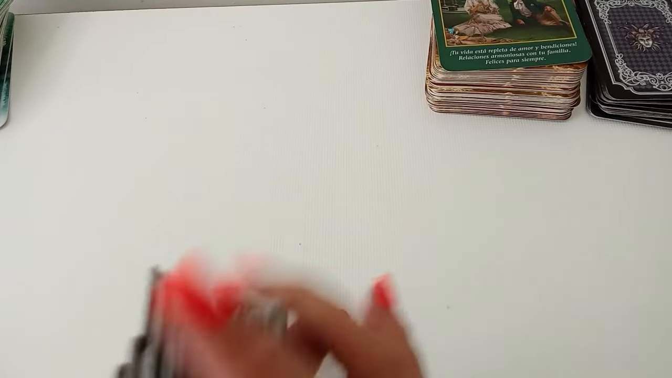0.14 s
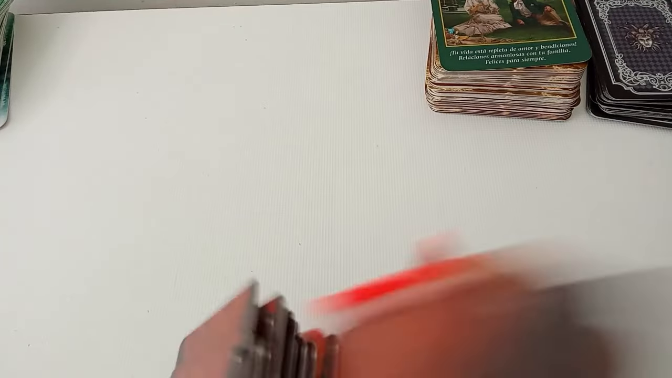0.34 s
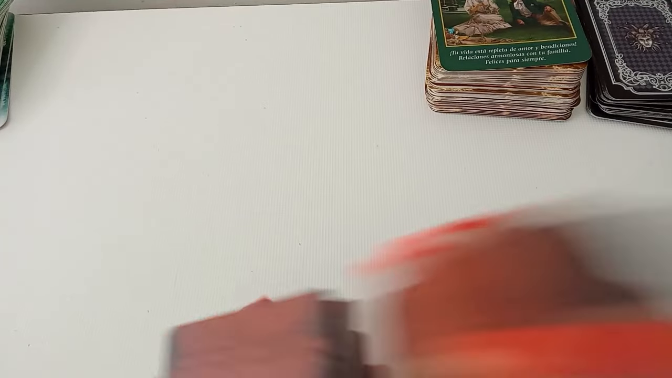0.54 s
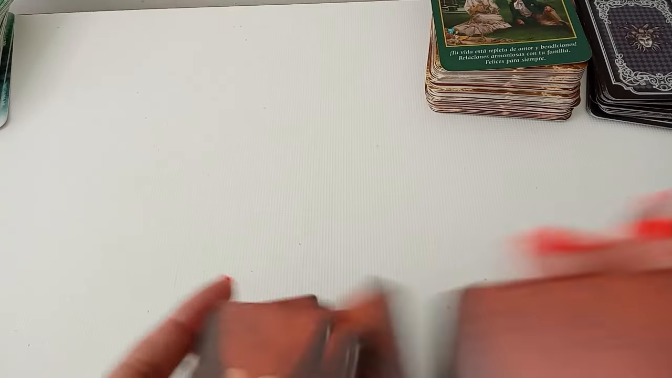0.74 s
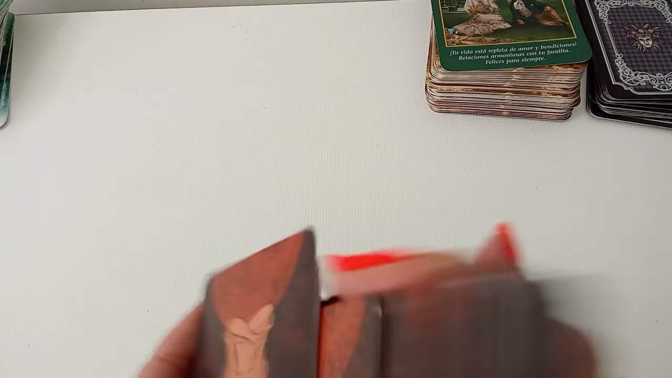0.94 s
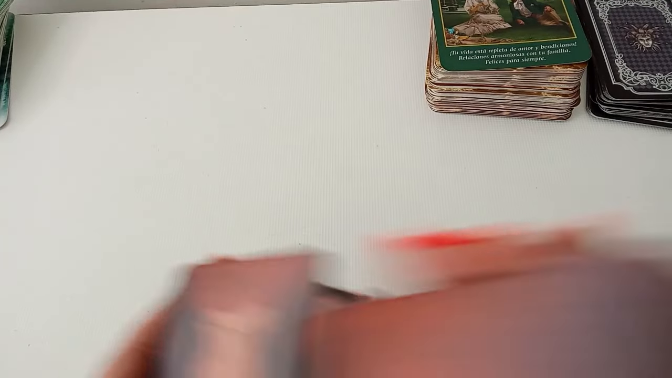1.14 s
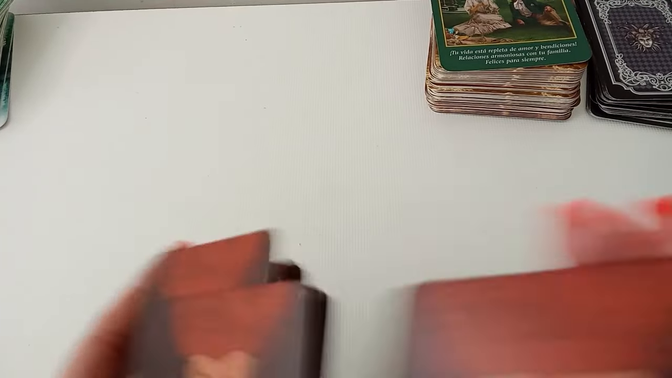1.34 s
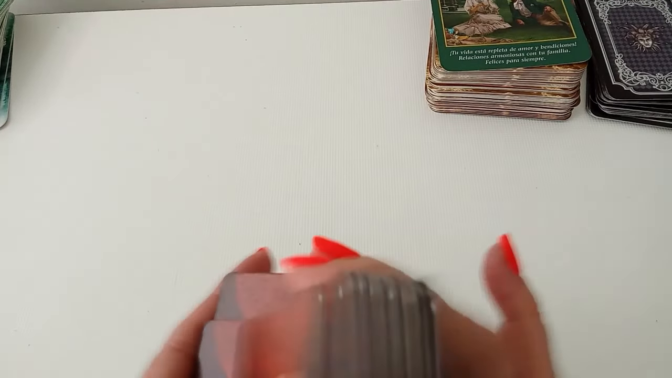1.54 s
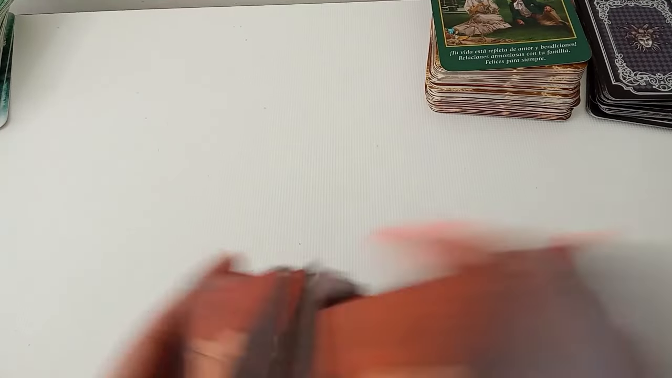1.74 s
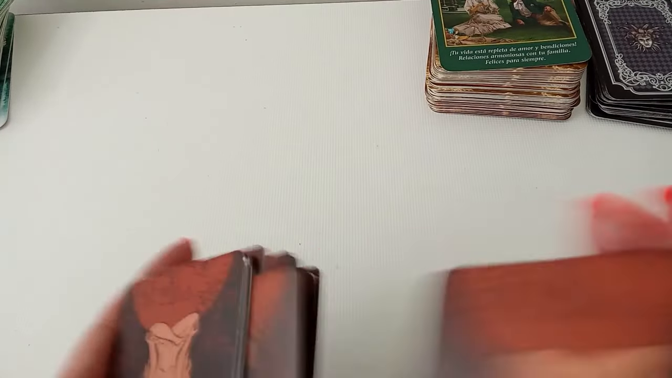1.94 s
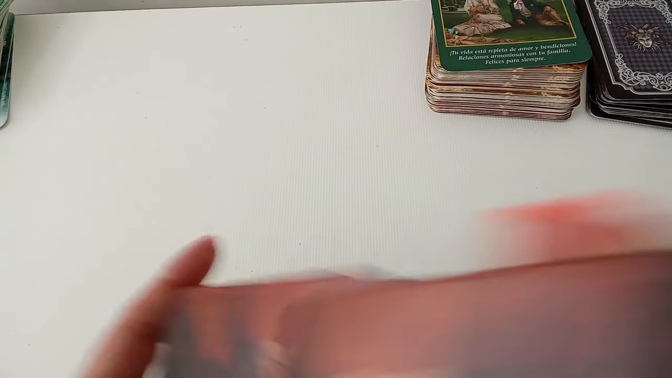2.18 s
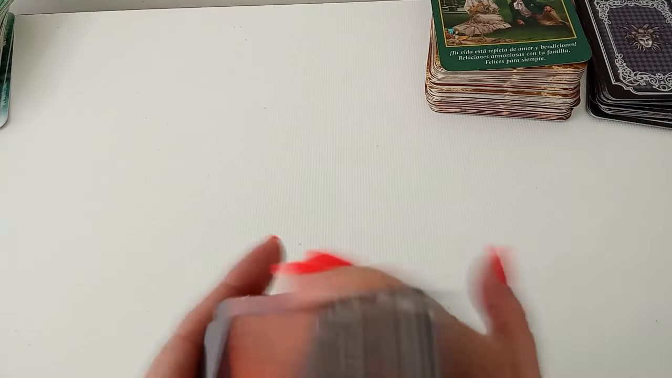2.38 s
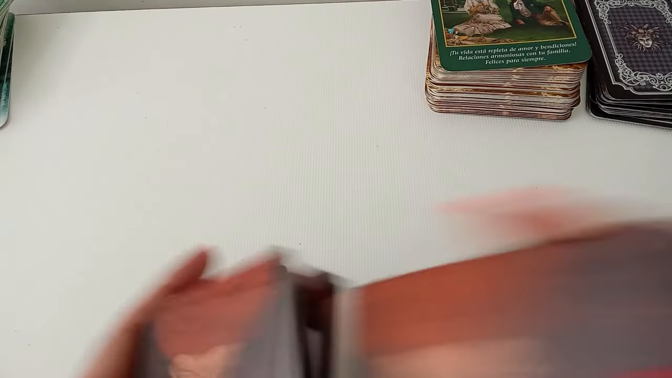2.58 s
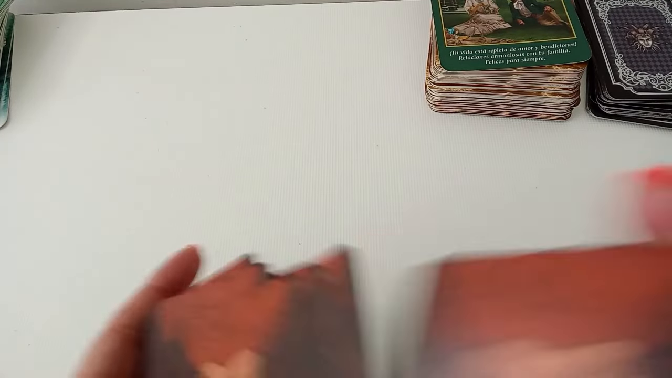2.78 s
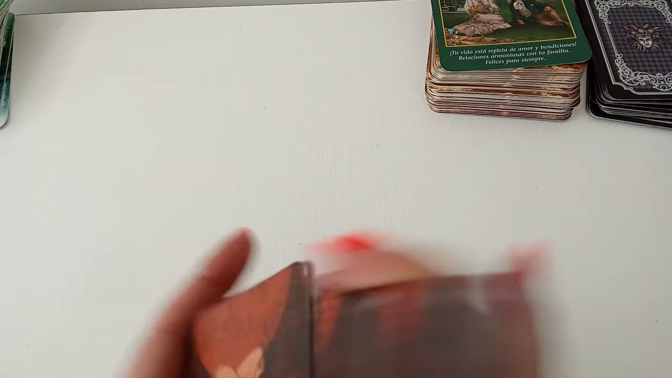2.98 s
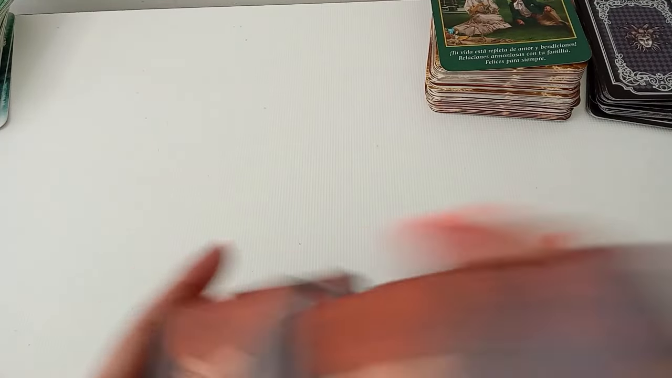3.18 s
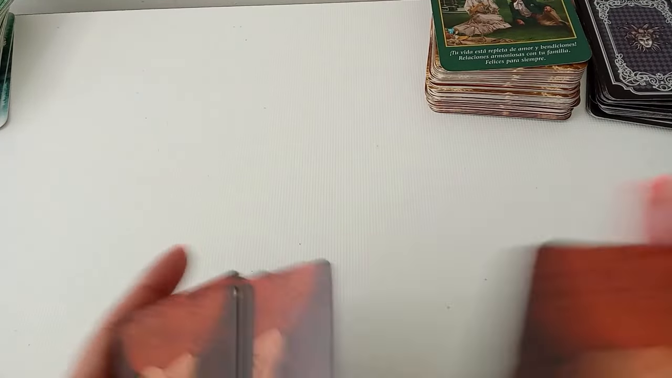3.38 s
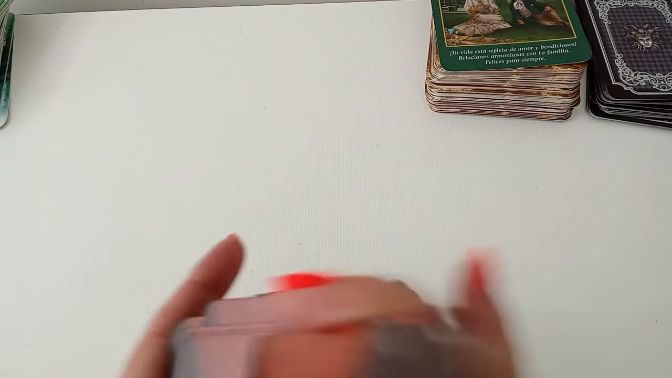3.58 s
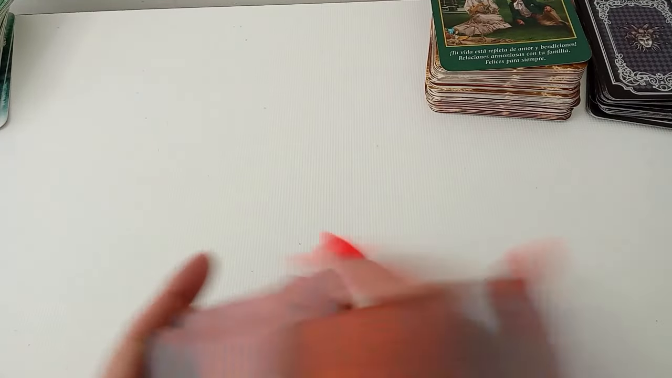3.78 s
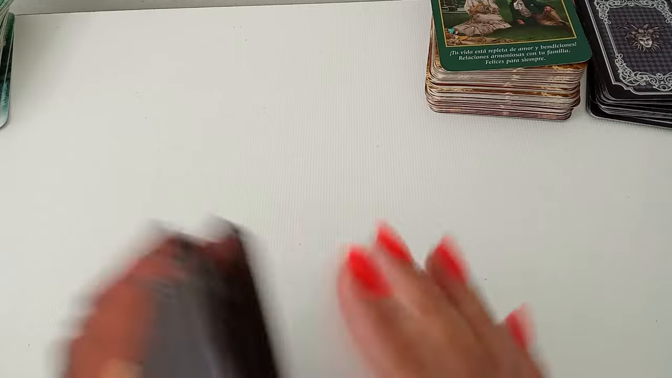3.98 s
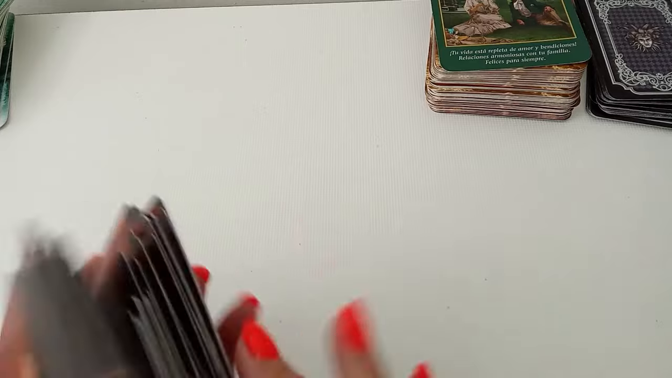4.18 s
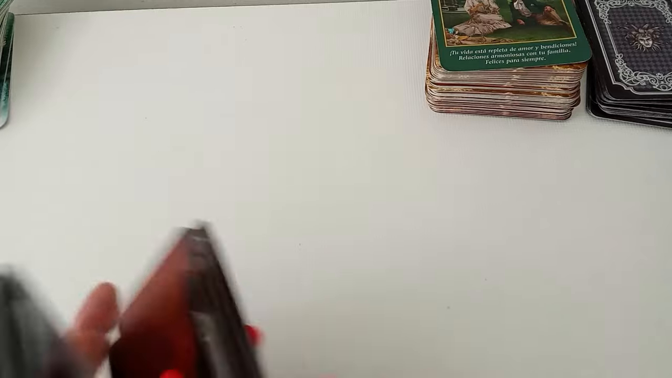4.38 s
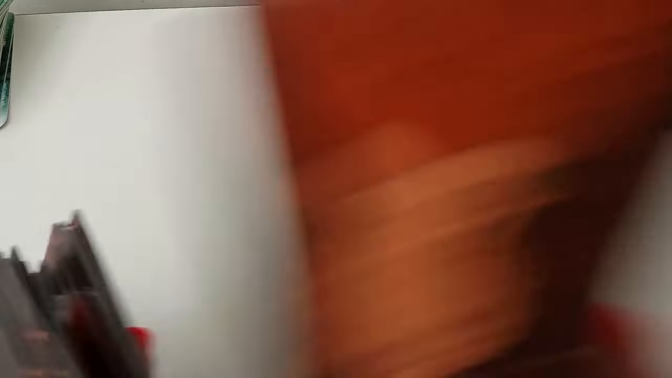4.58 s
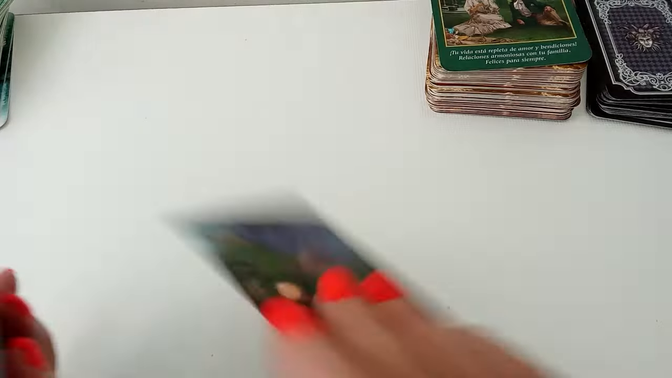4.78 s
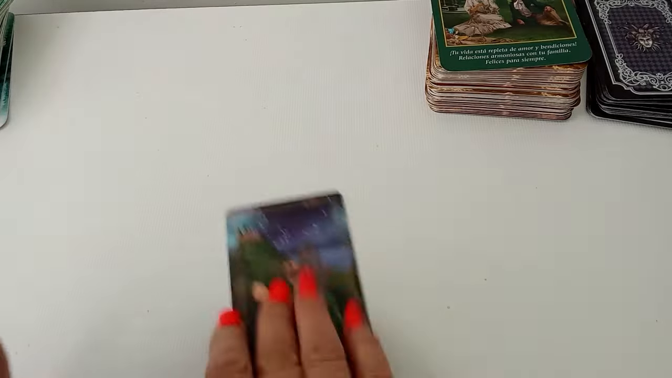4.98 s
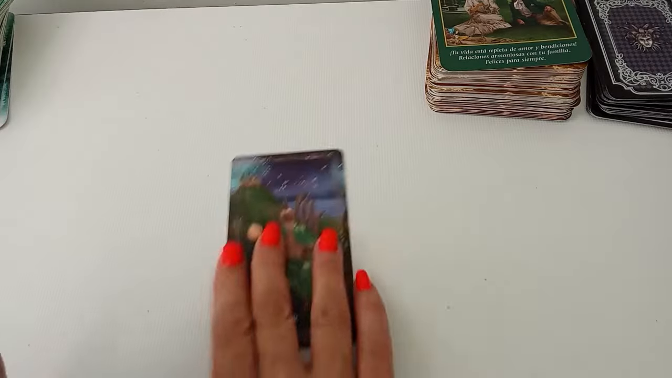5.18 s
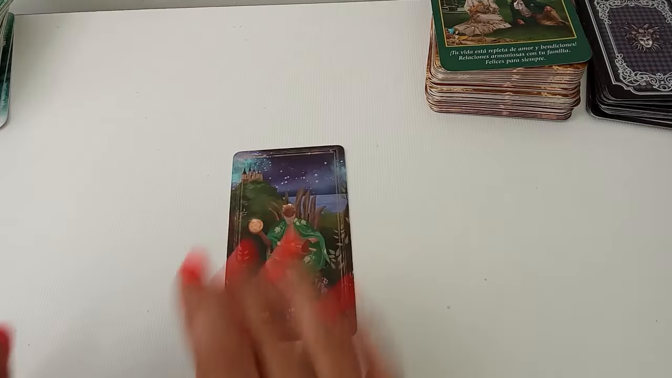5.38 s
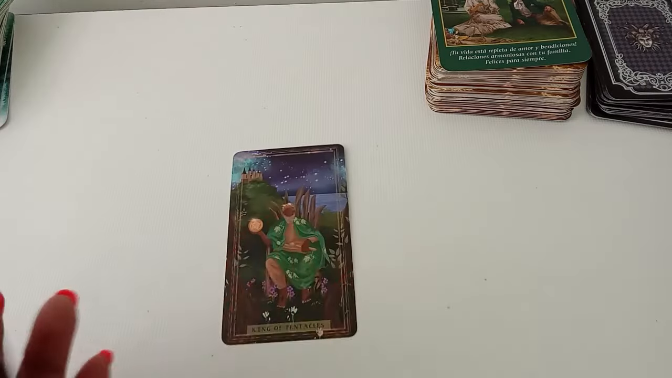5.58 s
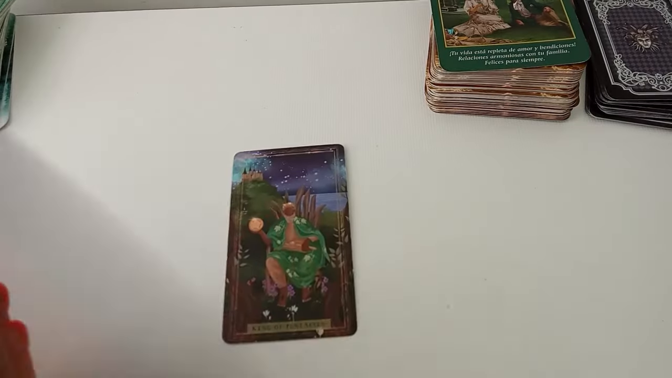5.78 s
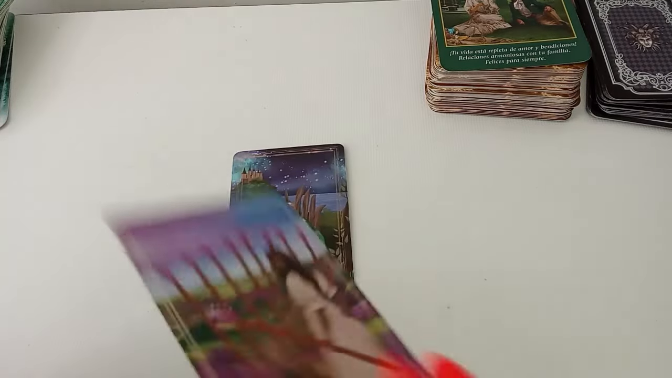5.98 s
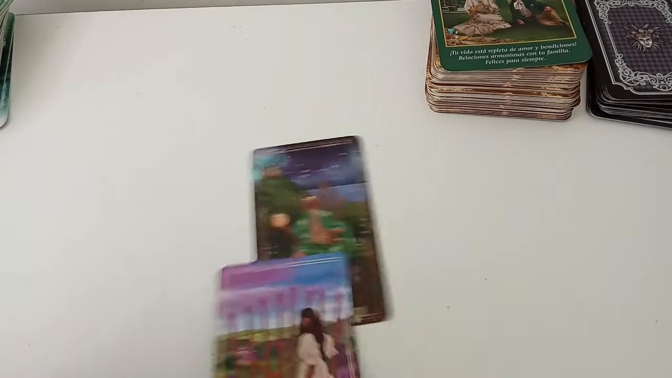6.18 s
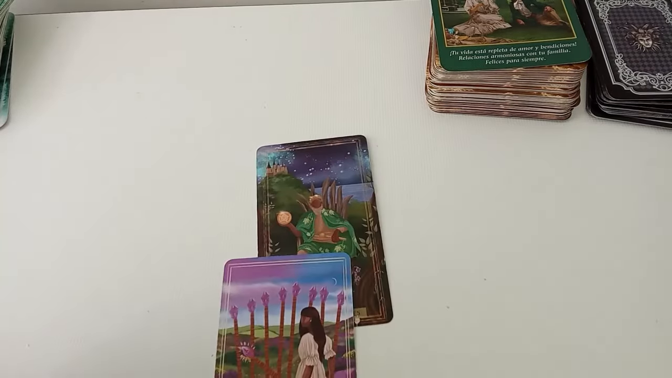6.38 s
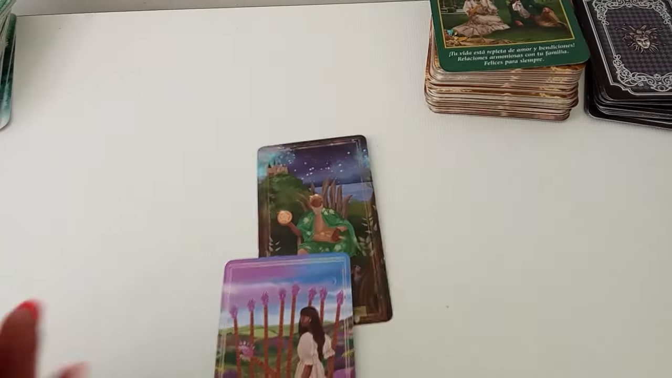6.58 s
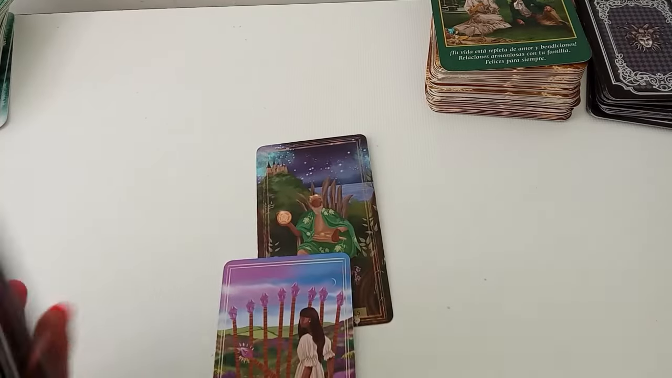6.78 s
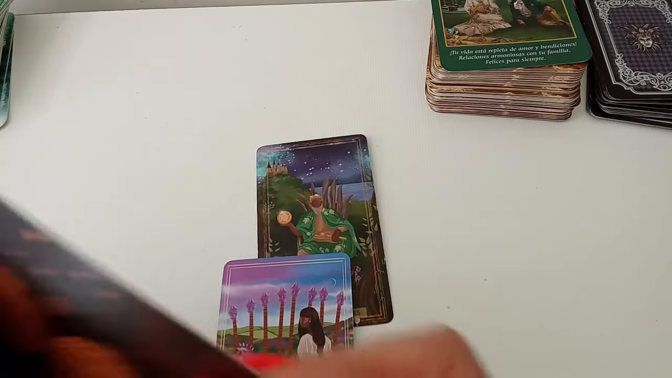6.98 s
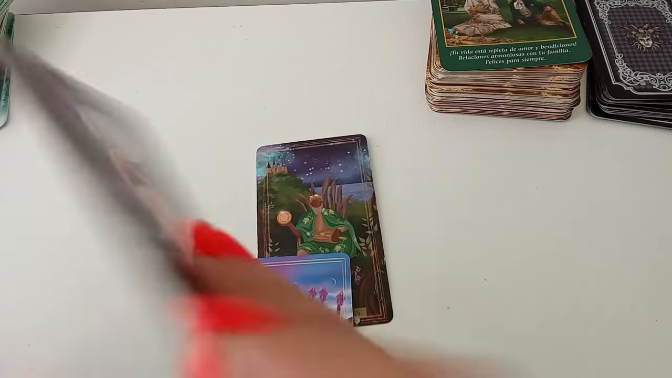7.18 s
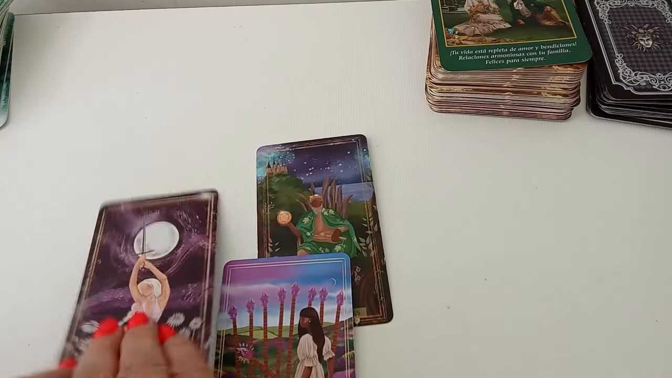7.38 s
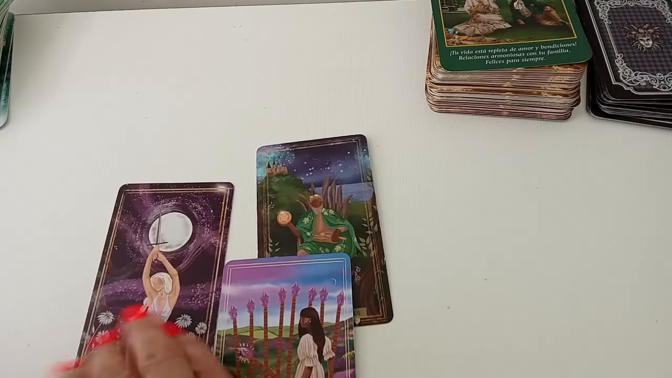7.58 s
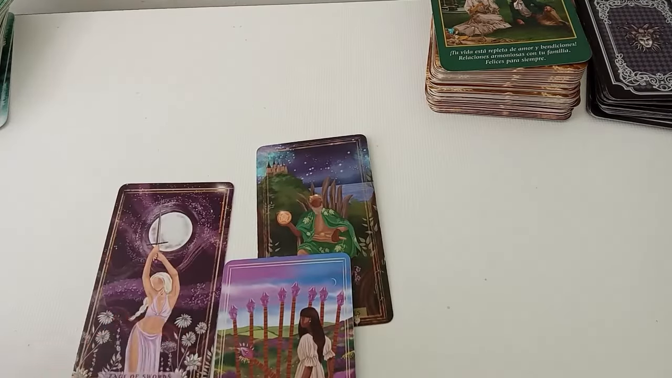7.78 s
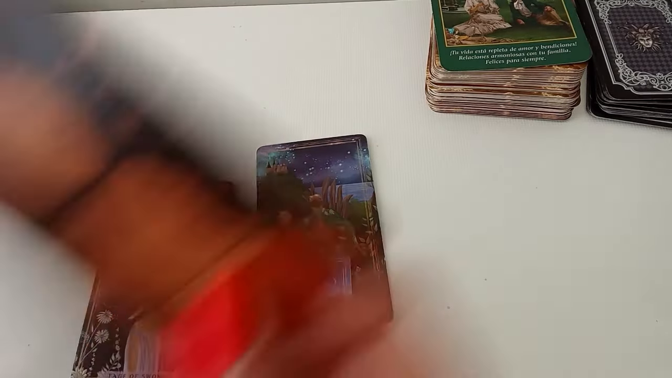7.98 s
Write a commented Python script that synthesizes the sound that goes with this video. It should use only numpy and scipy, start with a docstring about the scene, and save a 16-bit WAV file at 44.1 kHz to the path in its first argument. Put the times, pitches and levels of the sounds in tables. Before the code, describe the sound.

A deck of stiff cards is shuffled by hand, then three cards are dealt onto a hard table in a quiet room.

```python
"""Quiet room, hard table: hands shuffle a deck of stiff cards overhand, then deal three cards.
Faces slide with a grainy friction hiss, the deck thuds on palm or table, edges swish past.
Packets knock together, cards slap down, the table top rings; twice a corner flicks free.
The room rings for about half a second over a faint room tone.
Two microphone signals are summed under 1 ms apart: comb notches, a hollow colour."""
import sys
import numpy as np
from scipy import signal
from scipy.fft import rfft, irfft, next_fast_len
from scipy.io import wavfile
from scipy.ndimage import uniform_filter1d

SR = 44100
rng = np.random.default_rng(int(sys.argv[2]) if len(sys.argv) > 2 else 0)


def pcm_store(signal):
    """Save signal as 16-bit PCM."""
    levels = np.round(np.clip(np.atleast_2d(signal), -1, 1) * 32767)
    wavfile.write(sys.argv[1], SR, levels.astype(np.int16).T)


N = 354563

# faces sliding: t/s, length/s, hiss level/dB, brightness/dB, first-contact boost/dB
STROKES = [(0.0, 0.073, -71, 4.5, 12), (0.079, 0.21, -75, -8, -8), (0.31, 0.11, -76, -6, -3.5),
           (0.431, 0.061, -59, -3.5, -7.5), (0.689, 0.16, -64.5, -7.5, 4), (0.821, 0.16, -70, -6, -22),
           (0.986, 0.25, -66, -6.5, 8.5), (1.3, 0.17, -65.5, -5.5, 9.5), (1.597, 0.24, -66, -6.5, 12.5),
           (1.848, 0.19, -61, -6, 1), (2.182, 0.14, -64, -4.5, 13), (2.333, .1, -73.5, -3.5, 5.5),
           (2.477, 0.14, -62.5, -2.5, 6), (2.639, 0.1, -75.5, -4.5, 6.5), (2.759, 0.13, -61.5, -9, 5.5),
           (2.99, 0.049, -63, -8, -5), (3.054, 0.16, -62, -6.5, 10.5), (3.343, 0.14, -59.5, -9, 6.5),
           (3.65, 0.11, -63.5, -5, 8), (3.939, 0.11, -63.5, -10.5, 14), (4.23, 0.21, -75.5, -17, -6),
           (4.458, 0.15, -71, -7, 1.5), (4.538, 0.081, -61, -0.5, -4.5), (4.633, 0.068, -61, -14, 3),
           (4.8, 0.15, -78.5, -8, -20.5), (4.958, 0.036, -69, -9, 2), (5.002, 0.056, -55, -2.5, -1.5),
           (5.117, 0.193, -77.5, 1, -14), (5.344, 0.25, -86, -14.5, -10), (5.625, 0.068, -73, -12, 10),
           (5.692, 0.095, -61, 5, -4), (5.753, 0.16, -69.5, -4, 1), (5.982, 0.073, -69, -8, -3),
           (6.233, 0.24, -73, -13, 2.5), (6.788, 0.28, -69.5, 0, 1), (7.095, 0.051, -67.5, -5.5, -0.5),
           (7.224, 0.11, -78, -9.5, 9.5), (7.447, 0.059, -76.5, -18, 2), (7.499, 0.13, -69.5, -9.5, 10.5),
           (7.856, 0.025, -69, -28.5, -3), (7.898, 0.16, -67.5, -6, 3.5)]
# deck on palm or table: t/s, level/dB, f/Hz
THUDS = [(0.473, -45, 170), (0.73, -49.5, 187), (0.799, -50, 216), (1.136, -48.5, 159), (1.324, -36.5, 242),
         (2.021, -40, 165), (2.498, -35, 276), (2.508, -39, 315), (2.584, -47, 134), (3.07, -48.5, 210),
         (3.353, -46, 400), (3.393, -49, 166), (3.486, -40, 146), (3.744, -44, 387), (3.967, -38, 337),
         (4.052, -42.5, 370), (4.586, -44.5, 192), (4.961, -33, 244), (5.635, -51, 194),
         (5.867, -30.5, 310), (6.229, -46.5, 341), (6.444, -43.5, 323), (7.029, -49.5, 215),
         (7.453, -37.5, 400), (7.598, -46, 310), (7.86, -50.5, 308)]
# packets landing, cards slapping: t/s, knock level/dB, knock f/Hz, crack level/dB
KNOCKS = [(0.477, -39, 960, -67), (0.732, -35, 870, -35), (0.794, -38, 980, -42), (0.818, -38.5, 872, -60),
          (0.998, -33.5, 1250, -35), (1.012, -30, 1080, -35), (1.073, -52, 1250, -41),
          (1.14, -37.5, 1080, -47), (1.313, -49, 790, -51), (1.325, -36.5, 890, -38.5),
          (1.394, -46, 1320, -38.5), (1.596, -44, 1000, -39), (1.627, -38, 1040, -65),
          (1.701, -42.5, 900, -44), (1.873, -37.5, 1080, -60), (1.886, -30.5, 1150, -37.5),
          (1.979, -42, 990, -43), (1.992, -31, 1010, -30.5), (2.006, -27, 1300, -57.5),
          (2.185, -35.5, 1020, -31.5), (2.219, -39, 970, -36), (2.294, -37.5, 1000, -49),
          (2.478, -46, 1330, -40), (2.498, -29, 1000, -35), (2.561, -41, 940, -41),
          (2.589, -39.5, 930, -67), (2.598, -44, 970, -63), (2.776, -29, 1030, -23),
          (2.79, -31.5, 780, -29), (2.859, -35.5, 825, -38.5), (3.064, -23.5, 1285, -27.5),
          (3.076, -26, 1800, -51.5), (3.16, -38.5, 935, -64.5), (3.194, -35, 1170, -43.5),
          (3.344, -34, 910, -31.5), (3.355, -25.5, 1050, -25), (3.391, -33.5, 970, -60),
          (3.452, -36, 970, -42), (3.486, -36.5, 1090, -39.5), (3.675, -38.5, 872, -84.5),
          (3.698, -37, 1060, -38), (3.745, -28.5, 860, -36), (3.947, -24.5, 886, -59),
          (3.973, -46, 867, -30.5), (4.051, -42.5, 890, -52), (4.594, -42, 770, -41.5),
          (4.64, -33.5, 930, -37), (4.96, -27.5, 1160, -33), (5.039, -33.5, 980, -35),
          (5.631, -74.5, 810, -44), (5.855, -36, 1160, -30), (5.866, -27, 800, -36.5),
          (5.884, -27.5, 785, -52), (6.23, -49.5, 910, -43), (6.441, -50.5, 925, -53.5),
          (6.796, -53, 990, -61), (7.451, -33, 900, -42.5), (7.6, -56.5, 1360, -50), (7.855, -70, 787, -49),
          (7.898, -50.5, 800, -49)]
# edges brushing past: t/s, level/dB, length/s
SWISHES = [(0.971, -55, 0.013), (1.11, -48, 0.04), (1.737, -45.5, 0.025), (1.861, -38.5, 0.0057),
           (1.897, -40, 0.0099), (2.275, -41.5, 0.041), (2.986, -50, 0.021), (3.127, -47, 0.048),
           (3.814, -55.5, 0.079), (4.178, -52, 0.071), (4.291, -48.5, 0.014), (4.397, -64, 0.021),
           (4.478, -52, 0.0091), (6.345, -51.5, 0.021), (7.032, -45.5, 0.034), (7.187, -45.5, 0.054)]
# corners flicking free: t/s, level/dB, f/Hz
FLICKS = [(5.0788, -35.5, 4490), (5.759, -47, 3230)]

# spectra of dull hiss, airy hiss, low rustle, edge crack, room tone: f/Hz, level/dB
DULL_SPECTRUM = [(1500, 5.5), (3200, 3), (4300, 11), (6500, 10.5), (9000, 4), (13000, -46)]
AIRY_SPECTRUM = [(4500, -27), (7000, -17.5), (10000, 4), (13000, -4), (16000, -13)]
RUSTLE_SPECTRUM = [(90, -21), (200, 1), (500, 0), (1100, -7), (2000, -25.5), (5000, -38)]
CRACK_SPECTRUM = [(250, -15.5), (1300, 21), (3000, 6), (4300, 14), (6500, 5), (9000, -1.5), (15000, -23)]
ROOM_TONE_SPECTRUM = [(30, -35), (115, -2.5), (295, -19), (328, -5), (449, -21), (4910, -44.5),
                      (16000, -72)]
# spectra of deck thud, packet knock: f/pitch, level/dB
THUD_SPECTRUM = [(.15, -67), (0.599, -17), (1.001, 0), (1.5, -3.5), (4.0, -37.5)]
KNOCK_SPECTRUM = [(0.07, -85.5), (0.396, -4), (0.701, 0), (0.999, 4), (1.6, -6), (2.4, -19.5), (4.0, -37.5)]
# table-top modes: f/Hz, level/dB, T60/s
TABLE_MODES = [(323, -1.5, 0.43), (795, 1, 0.48), (872, -11, 0.65)]
# room decay: f/Hz, T60/s
ROOM_T60 = [(100, 0.35), (400, 0.35), (1000, 0.22), (2500, 0.52), (6000, 0.22), (14000, 0.078)]
# second microphone, relative to the first: f/Hz, level/dB
SECOND_MIC = [(500, -3.5), (1600, -3), (2700, -.8), (6000, -.7), (8000, -2), (11300, -5.5), (13500, -1.5)]


def from_db(db):
    """dB to gain."""
    return 10 ** (np.asarray(db) / 20)


def unit_rms(x):
    """Scale to rms 1."""
    return x / np.sqrt(np.mean(x ** 2) + 1e-20)


def at_hz(points, hz):
    """Table lookup over log frequency."""
    points_hz, values = np.transpose(points)
    return np.interp(np.log(np.maximum(hz, 1.)), np.log(points_hz), values)


def colour(x, spectrum):
    """Minimum-phase filter with this spectrum."""
    gain = from_db(at_hz(spectrum, np.fft.rfftfreq(4096, 1 / SR)))
    cepstrum = irfft(np.log(gain))
    cepstrum[1:2048] *= 2
    cepstrum[2049:] = 0
    return signal.oaconvolve(x, irfft(np.exp(rfft(cepstrum))))[:len(x)]


def drift(rate_hz):
    """Slow random wander, rms 1."""
    pole = np.exp(-2 * np.pi * rate_hz / SR)
    slow = signal.lfilter([1], [1, -2 * pole, pole * pole], rng.standard_normal(N + SR))
    return unit_rms(slow[SR:])


def friction(spectrum, slips_per_s, spread_db):
    """Tiny random slips of uneven size, filtered; rms 1."""
    sizes = from_db(spread_db * np.minimum(rng.exponential(1, N), 4)) * rng.choice([-1, 1], N)
    slips = sizes * (rng.random(N) < slips_per_s / SR)
    return unit_rms(colour(slips, spectrum))


def blows(times_s, levels_db, spectra, rise_s, fall_s, roughness, straggle_gain=0., straggle_s=.009):
    """One short noisy push per blow, filtered; straggle_gain adds three late edges."""
    def push(age_s):
        age_s = np.maximum(age_s, 0)
        return (1 - np.exp(-age_s / rise_s)) * np.exp(-age_s / fall_s)

    t, out = np.arange(4096) / SR, np.zeros(N + 4096)
    for start_s, level_db, spectrum in zip(times_s, levels_db, spectra):
        noise = rng.standard_normal(len(t))
        lags, weights = rng.random((2, 3))
        envelope = push(t) + straggle_gain * weights @ push(t - straggle_s * lags[:, None])
        burst = colour((1 + roughness * noise) * envelope, spectrum)
        at = round(start_s * SR)
        out[at:at + len(t)] += from_db(level_db) * burst / np.abs(burst).max()
    return out[:N]


def stroke_gains(contact_s=.033, release_db=11.5, release_s=.0024, settle_db_per_s=101, smooth_s=.016):
    """Dull, airy and rustle gains: hard first contact, hold, fingers ease off, cards settle."""
    t = np.arange(N) / SR
    tilt = np.array([[0], [1], [-.81]])   # dull, airy, rustle: dB per dB of brightness
    power = np.ones((3, N)) * from_db(-98 - .5 * tilt) ** 2   # held deck creaks faintly
    for start_s, length_s, hiss_db, bright_db, contact_db in STROKES:
        span = slice(round(start_s * SR), round((start_s + length_s + .5) * SR))
        after_s = np.maximum(t[span] - start_s - length_s, 0)
        press_db = hiss_db + contact_db * (t[span] < start_s + contact_s)
        fade_db = release_db * np.minimum(after_s / release_s, 1) + settle_db_per_s * after_s
        power[:, span] += from_db(press_db - fade_db + bright_db * tilt) ** 2
    return from_db(uniform_filter1d(10 * np.log10(power), int(smooth_s * SR), axis=1))


def sliding(rustle_db=-7, tick_db=-9, firm_db=-62):
    """Faces rub over each other: bright strokes hiss airily, dull ones carry more low rustle."""
    dull_gain, airy_gain, rustle_gain = stroke_gains()
    grip = drift(29)   # finger pressure wavers
    dull = dull_gain * friction(DULL_SPECTRUM, slips_per_s=14000, spread_db=4)
    airy = airy_gain * friction(AIRY_SPECTRUM, slips_per_s=30000, spread_db=1.5)
    hiss = from_db(1.6 * grip) * (dull + from_db(2.5 * drift(40)) * airy)
    rustle = rustle_gain * friction(RUSTLE_SPECTRUM, slips_per_s=2500, spread_db=3.5)
    # single edges catch, far more under a firm stroke
    catch_gain = from_db(firm_db + tick_db + 2 * grip) * (dull_gain / from_db(firm_db)) ** 1.5
    ticks = catch_gain * friction(CRACK_SPECTRUM, slips_per_s=220, spread_db=4)
    return hiss + from_db(rustle_db + 4 * grip) * rustle + ticks


def wander_colour(x, edges_hz=(2500, 4000, 6000, 9500), depth_db=2.5, rate_hz=7):
    """Each band swells and sinks independently."""
    out = 0
    for hz in edges_hz:
        band = signal.sosfiltfilt(signal.butter(2, hz, fs=SR, output="sos"), x)
        out = out + from_db(depth_db * drift(rate_hz)) * band
        x = x - band
    return out + from_db(depth_db * drift(rate_hz)) * x


def room_tone(level_db=-73, depth_db=3.4):
    """Faint low noise, wavering in level."""
    gain = from_db(level_db + depth_db * drift(7.9))
    return gain * unit_rms(colour(rng.standard_normal(N), ROOM_TONE_SPECTRUM))


def reverb(x, send_db=-8, paths=4):
    """Diffuse tail, decaying band by band; moving hands keep changing the path through the room."""
    t = np.arange(int(.7 * SR)) / SR
    tails, edges_hz = 0, 60 * 2 ** np.arange(0, 8.1, .5)
    for low_hz, high_hz in zip(edges_hz, edges_hz[1:]):
        bandpass = signal.butter(2, [low_hz, high_hz], "band", fs=SR, output="sos")
        decay = from_db(-60 * t / at_hz(ROOM_T60, np.sqrt(low_hz * high_hz)))
        tails = tails + decay * signal.sosfilt(bandpass, rng.standard_normal((paths, len(t))))
    tails *= np.clip((t - .003) / .006, 0, 1)
    tails /= np.linalg.norm(tails, axis=1, keepdims=True)
    path = (np.arange(N) // 3000) % paths
    wet = sum(signal.oaconvolve(x * (path == k), tail)[:N] for k, tail in enumerate(tails))
    return from_db(send_db) * signal.lfilter([.3], [1, -.7], wet)   # walls absorb treble


def thuds():
    """Deck meets palm or table: a soft push lasting two or three cycles."""
    times_s, levels_db, pitches_hz = np.transpose(THUDS)
    spectra = [np.array(THUD_SPECTRUM) * [hz, 1] for hz in pitches_hz]
    return blows(times_s, levels_db, spectra, rise_s=.0008, fall_s=.001, roughness=2)


def table_top(force, gain_db=-57.5):
    """Damped table modes ring under each blow."""
    t = np.arange(SR // 2) / SR
    modes = sum(from_db(db - 60 * t / t60_s) * np.sin(2 * np.pi * hz * t)
                for hz, db, t60_s in TABLE_MODES)
    return from_db(gain_db) * signal.oaconvolve(force, modes)[:N]


def knocks():
    """Many edges land within milliseconds: the packet knocks hollow, the edges crack."""
    times_s, knock_db, pitches_hz, crack_db = np.transpose(KNOCKS)
    hollow = [np.array(KNOCK_SPECTRUM) * [hz, 1] for hz in pitches_hz]
    sharp = [CRACK_SPECTRUM] * len(times_s)
    landing = dict(roughness=30, straggle_gain=from_db(-9))
    knock = blows(times_s, knock_db, hollow, rise_s=.0007, fall_s=.0014, **landing)
    crack = blows(times_s, crack_db, sharp, rise_s=.0008, fall_s=.0018, **landing)
    return knock + crack


def swishes(airy_db=-4.5):
    """Edges brush past: friction that swells quickly and fades."""
    t, envelope = np.arange(N) / SR, np.zeros(N)
    for start_s, level_db, length_s in SWISHES:
        progress = np.clip((t - start_s) / length_s, 0, 1)
        envelope += from_db(level_db) * np.sin(np.pi * progress ** .85) ** 2
    slips = friction([(1, 0), (SR / 2, 0)], slips_per_s=20000, spread_db=3.5)   # flat spectrum
    dull = unit_rms(colour(slips, DULL_SPECTRUM))
    airy = unit_rms(colour(slips, AIRY_SPECTRUM))
    return envelope * (dull + from_db(airy_db) * airy) / 4   # crest factor about 4


def flicks(length_s=.0045, scrape=.35):
    """A corner scrapes free with a brief pitched tick."""
    t, out = np.arange(N) / SR, np.zeros(N)
    for start_s, level_db, pitch_hz in FLICKS:
        envelope = np.sin(np.pi * np.clip((t - start_s) / length_s, 0, 1)) ** 2
        out += from_db(level_db) * envelope * np.sin(2 * np.pi * pitch_hz * t)
    return out * (1 + scrape * rng.standard_normal(N))


def scene(near_send_db=-9):
    """Cards, table, reverb and room tone; mono."""
    thud, knock = thuds(), knocks()
    cards = wander_colour(sliding() + swishes()) + knock + table_top(thud + knock)
    near = thud + flicks()   # these excite the room less
    return (cards + near + reverb(cards + from_db(near_send_db) * near) + room_tone())[None]


def record(dry, first_notch_hz=539.3, highpass_hz=70, stop_hz=16000):
    """Two microphone signals summed with a delay: evenly spaced notches; then band-limited."""
    size = next_fast_len(N + 256)
    hz = np.fft.rfftfreq(size, 1 / SR)
    delay_s = .5 / first_notch_hz
    second_mic = from_db(at_hz(SECOND_MIC, hz)) * np.exp(-2j * np.pi * hz * delay_s)
    combed = irfft(rfft(dry, size) * (1 + second_mic), size)[:, :N]
    highpass = signal.butter(4, highpass_hz, "high", fs=SR, output="sos")   # small mics: no deep bass
    lowpass = signal.cheby2(20, 60, stop_hz, fs=SR, output="sos")
    return signal.sosfilt(lowpass, signal.sosfilt(highpass, combed))


dry = scene()
out = record(dry)
pcm_store(out)
```